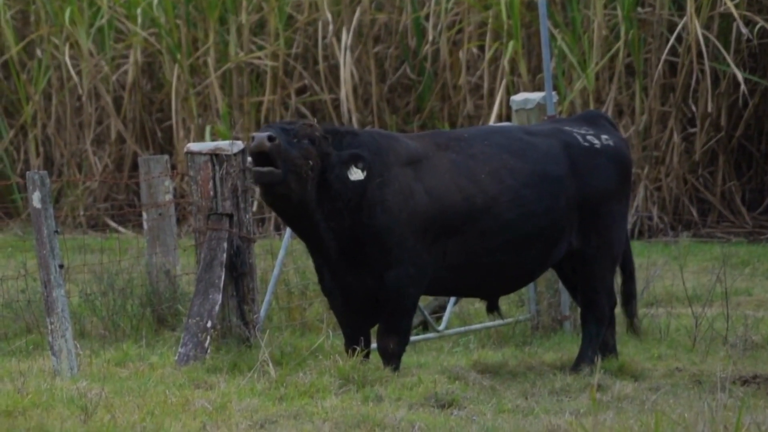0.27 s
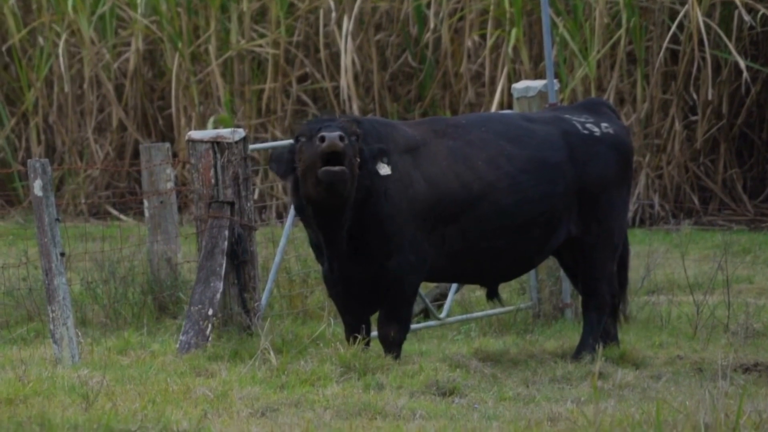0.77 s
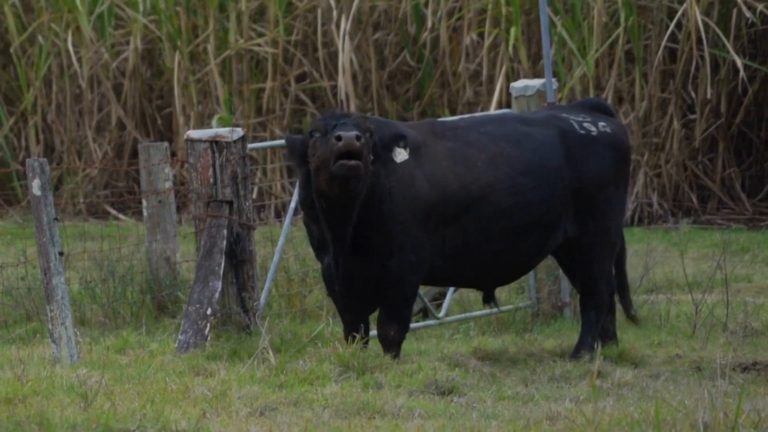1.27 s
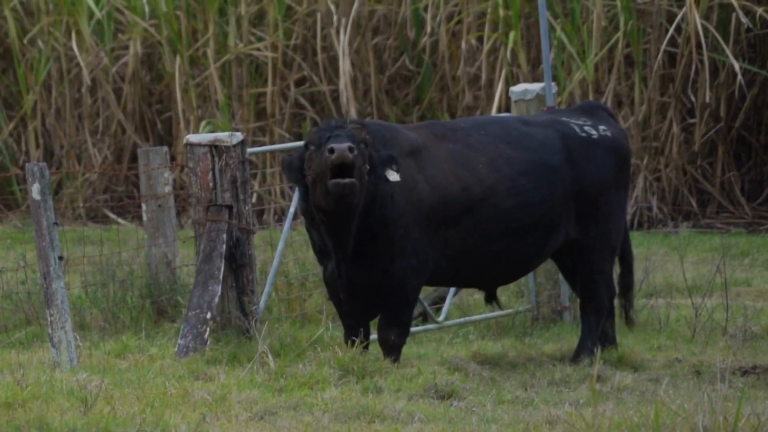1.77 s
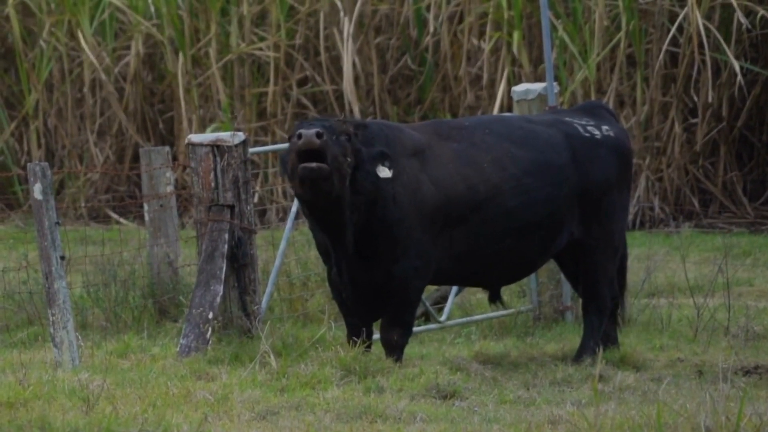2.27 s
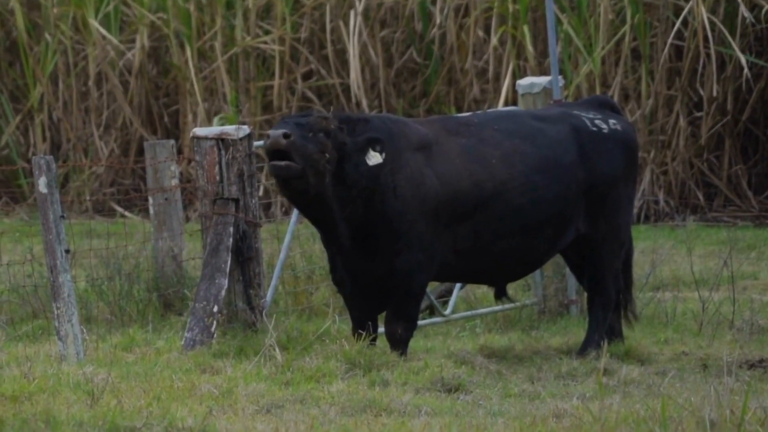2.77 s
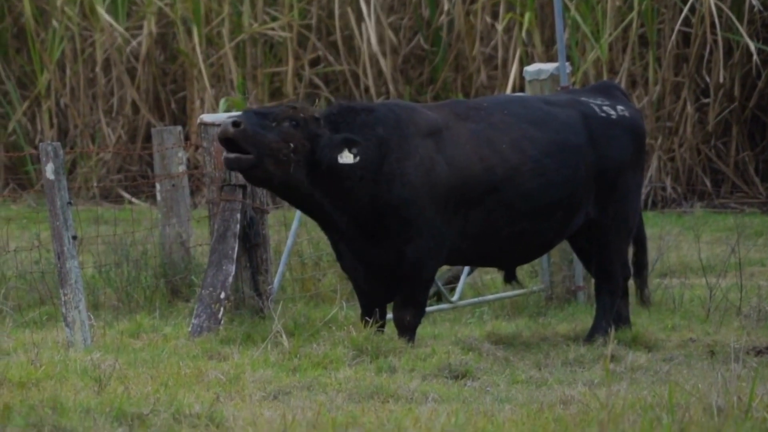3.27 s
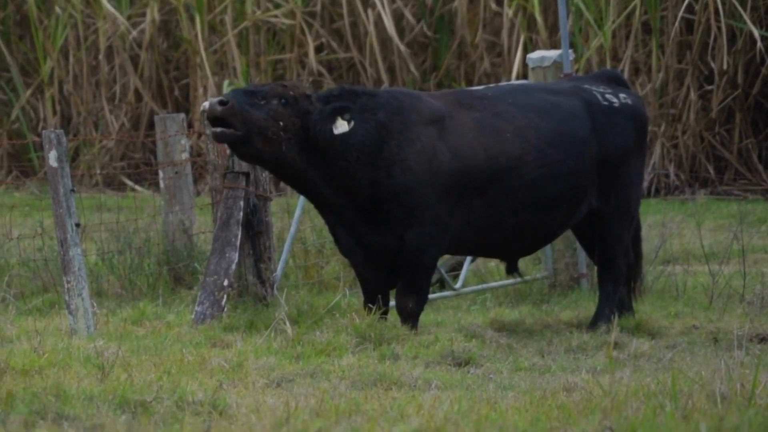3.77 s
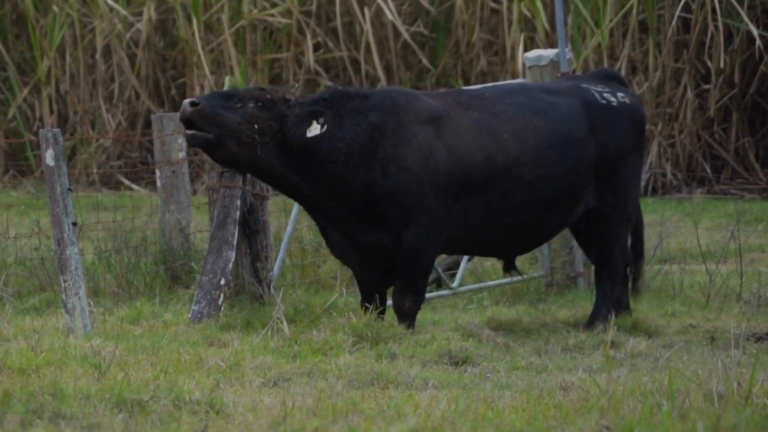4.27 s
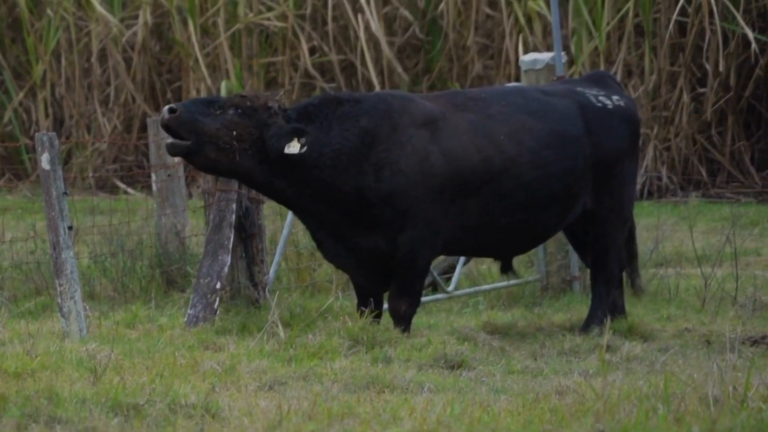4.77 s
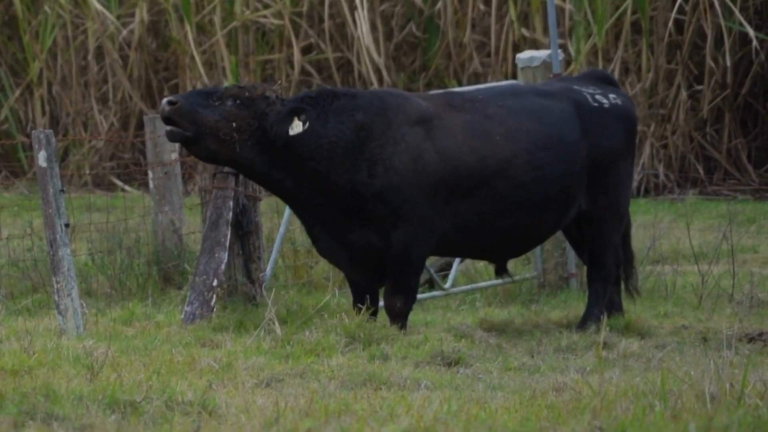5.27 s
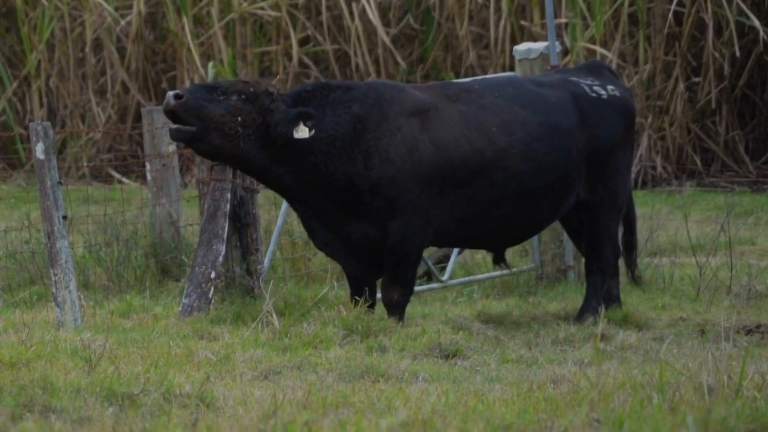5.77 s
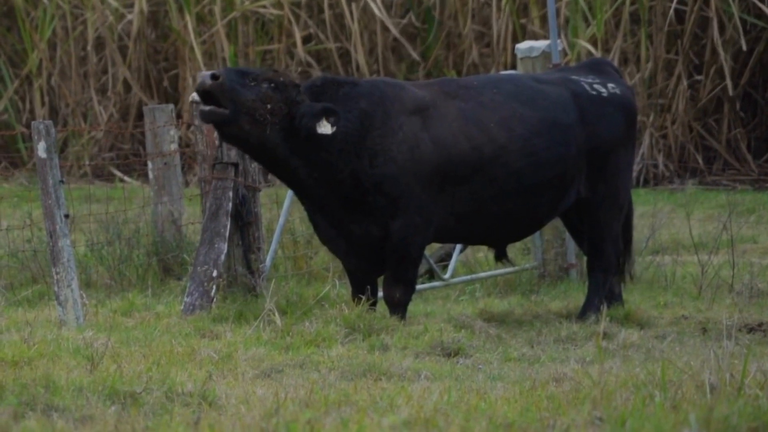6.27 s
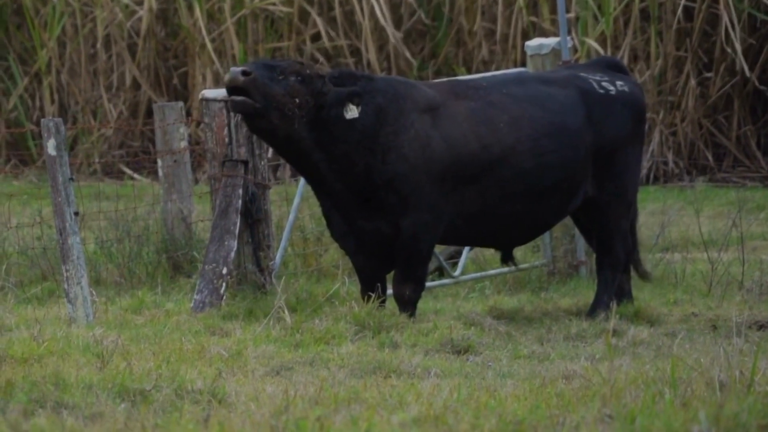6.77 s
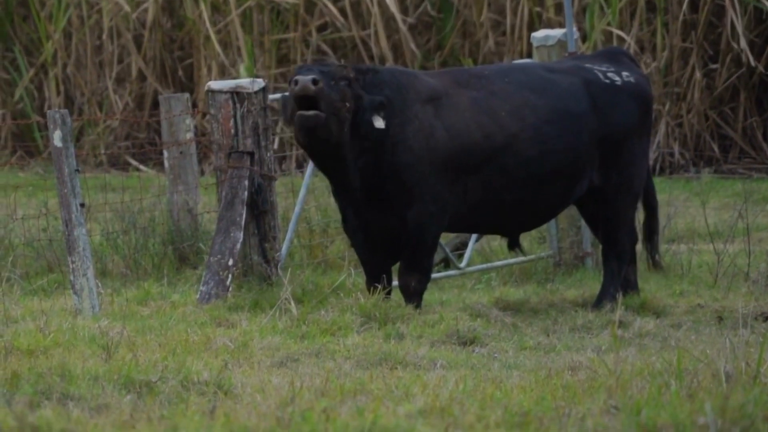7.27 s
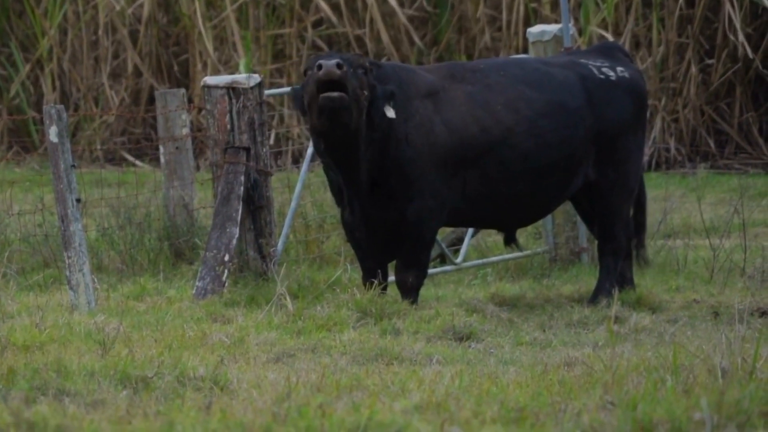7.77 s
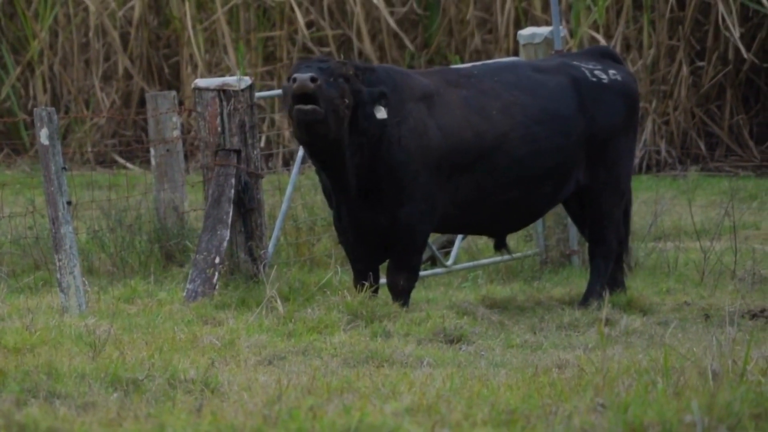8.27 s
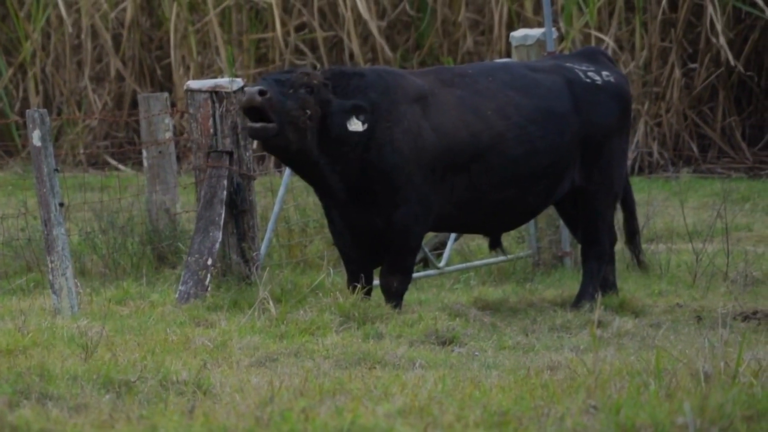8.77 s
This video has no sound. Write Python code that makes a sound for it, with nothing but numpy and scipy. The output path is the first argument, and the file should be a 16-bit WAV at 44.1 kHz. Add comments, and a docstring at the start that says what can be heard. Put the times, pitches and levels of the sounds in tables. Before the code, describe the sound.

A bull bellows seven times in an open pasture, with only short pauses between calls. Each begins as a deep hum, glides up to a high, hoarse held note and drops quickly away. A short echo comes back from the surroundings. Wind rumbles on the microphone, gusting most near the start, over a faint rustle of leaves.

```python
"""A bull bellows seven times in a pasture: deep hum, upward glide, high hoarse hold, quick drop.
Vocal-fold harmonics and rasping air ring through throat and mouth; the glide comes as the mouth opens.
Ground, posts and a wall of tall cane throw the calls back. Wind rumbles on the microphones
over the faint rustle of the field."""
import sys
import numpy as np
from scipy import signal
from scipy.fft import rfft, irfft, next_fast_len
from scipy.io import wavfile
from scipy.ndimage import uniform_filter1d

SR = 44100
rng = np.random.default_rng(int(sys.argv[2]) if len(sys.argv) > 2 else 0)


def log_audio(samples):
    """Write samples as a 16-bit WAV file to the path given in sys.argv[1]."""
    # one column per channel
    frames = np.atleast_2d(samples).T
    # limit to full scale, then quantise
    limited = np.clip(frames, -1, 1)
    pcm = np.round(limited * 32767).astype(np.int16)
    wavfile.write(sys.argv[1], SR, pcm)


N = 396900  # 9 s


def amp(db):
    return 10 ** (np.asarray(db) / 20)


def unit_rms(x):
    return x / np.sqrt(np.mean(x ** 2) + 1e-20)


def at_hz(points, hz):
    """Interpolates (frequency, value) rows over log frequency."""
    f, value = np.transpose(points)
    return np.interp(np.log(hz + 1), np.log(f + 1), value)


def filtered(x, gain):
    """Applies a real or complex gain(hz)."""
    size = next_fast_len(x.shape[-1] + 4096)
    return irfft(rfft(x, size) * gain(np.fft.rfftfreq(size, 1 / SR)), size)[..., :x.shape[-1]]


def wander(count, cutoff_hz):
    """Low-passed noise, rms 1."""
    return unit_rms(filtered(rng.standard_normal(count), lambda f: 1 / (1 + (f / cutoff_hz) ** 4)))


def wind_db(smooth_s):
    """Wind level: sudden gusts over a slow breeze."""
    # breeze (time [s], level [dB])
    breeze = [(0, -52.5), (.7, -48), (1.1, -33.5), (1.43, -32), (1.73, -53.5), (2.1, -43.5), (2.83, -49.5),
              (3.03, -51), (6.7, -48), (7.07, -54), (7.87, -50), (9, -52)]
    # gusts (peak time [s], peak level [dB], rise [dB/s])
    gusts = [(.05, -39, 502), (0.401, -34, 292), (.63, -28.5, 199), (1.05, -24, 63), (2.15, -40, 153),
             (2.88, -34, 265), (3.53, -40.5, 57), (4.05, -45, 198), (4.36, -30, 547), (5.16, -39, 82),
             (5.95, -42.5, 146), (6.52, -37, 91), (7.95, -42, 145), (8.95, -41, 145)]
    fall_db_per_s = 212.5
    t = np.arange(N) / SR
    level_db = np.interp(t, *np.transpose(breeze))
    for peak_s, peak_db, rise_db_per_s in gusts:
        below_db = np.where(t < peak_s, rise_db_per_s * (peak_s - t), fall_db_per_s * (t - peak_s))
        level_db = np.maximum(level_db, peak_db - below_db)
    return uniform_filter1d(level_db, round(smooth_s * SR))


def rustle():
    """Leaves and distant air: patchy noise that swells with the wind."""
    # rustle spectrum (frequency [Hz], relative density [dB])
    spectrum = [(120, -26.5), (250, -8), (450, -11.5), (900, 3.5), (1300, -1), (2000, -12.5), (3500, -18.5),
                (6000, -15.5), (8500, -23), (15500, -33.5)]
    # left-right likeness (frequency [Hz], correlation [-])
    likeness = [(300, 0.32), (1500, 0.74), (4500, 0.35), (7000, 0.49), (12000, 1)]
    frames, hz = N // 256 + 5, np.fft.rfftfreq(1024, 1 / SR)
    left_re, left_im, own_re, own_im, patches = rng.standard_normal((frames, 513, 5)).T
    patch_db = 2.5 * unit_rms(uniform_filter1d(uniform_filter1d(patches, 12, 0), 14, 1))
    corr = np.clip(at_hz(likeness, hz), -1, 1)[:, None]
    left = left_re + 1j * left_im
    right = corr * left + np.sqrt(1 - corr ** 2) * (own_re + 1j * own_im)
    bins = np.array([left, right]) * amp(at_hz(spectrum, hz)[:, None] + patch_db)
    noise = unit_rms(signal.istft(bins, nperseg=1024, noverlap=768)[1][:, :N])
    return noise * amp(-44 + 0.15 * (wind_db(smooth_s=0.47) + 51.5))


def wind_rumble():
    """Lumpy rumble, partly different at the two microphones; stronger wind reaches higher."""
    # rumble spectrum (frequency [Hz], relative density [dB])
    spectrum = [(10, -39.5), (20, -14.5), (45, -6), (80, -2.5), (130, -11.5), (200, -20.5), (300, -37.5),
                (500, -78.5)]
    common, side = rng.standard_normal((2, N)) * amp(4.3 * wander(N, 18))
    pair = np.array([common + 0.35 * side, common - 0.24 * side])
    rumble = unit_rms(filtered(pair, lambda f: amp(at_hz(spectrum, f))))
    upper = filtered(rumble, lambda f: 1 / (1 + (135 / (f + 1)) ** 8))
    upper *= amp(0.22 * (wind_db(smooth_s=0.99) + 34.5))
    return (rumble + upper) * amp(wind_db(smooth_s=.005))


def field_echoes(x):
    """Single echoes plus a decaying tail of sparse scatter."""
    # echoes off ground, posts and cane (delay [s], gain before colouring [dB])
    echoes = [(.018, -27.5), (.055, -22), (.125, -12), (.2, -17.5), (.31, -22.5)]
    # tail decay (frequency [Hz], T60 [s])
    t60 = [(150, 0.63), (400, 1.37), (1000, 1), (2500, 0.33), (8000, 0.67)]
    # colour of all reflections (frequency [Hz], gain [dB])
    colour = [(100, -4.5), (200, -12.5), (320, -1.5), (390, 16), (460, 5), (600, -5), (1000, -5.5),
              (2000, -8), (6000, 0.5)]
    taps = np.zeros((2, SR))
    tap_at = np.arange(900, SR - 20, 20) + rng.integers(0, 20, (2, (SR - 901) // 20))
    np.put_along_axis(taps, tap_at, rng.choice([-1., 1.], tap_at.shape), 1)
    taps = np.array([[1, 0.95], [1, 0.075]]) @ taps  # channels partly alike
    hz, t, bins = signal.stft(taps, SR, nperseg=512)
    response = signal.istft(bins * amp(-60 * t / at_hz(t60, hz)[:, None]), SR, nperseg=512)[1]
    response *= amp(-10) / np.linalg.norm(response[0])
    for i, (delay_s, db) in enumerate(echoes):
        lag_samples = 6 * np.array([i % 2, 1 - i % 2])  # sides alternate
        response[[0, 1], round(delay_s * SR) + lag_samples] += amp(db)
    coloured = filtered(x, lambda f: amp(at_hz(colour, f)))
    return signal.fftconvolve(coloured[None], response, axes=1)[:, :N]


def microphone_ports(x):
    """Mono to stereo: the housing shifts phase and balance with frequency."""
    # phase difference (frequency [Hz], left lead [rad])
    lead = [(100, -0.34), (690, 0.39), (1030, -0.081), (1380, 1.59), (1750, 0.64), (2070, -1.1),
            (2400, 0.9), (3100, 0.55), (4300, -1.74), (5600, 1.7), (7600, 0.36), (12000, .3)]
    # balance (frequency [Hz], left minus right [dB])
    balance = [(100, -0.5), (200, -1.5), (400, -1.5), (700, 0), (1300, -2), (2400, 3), (4400, -3.5),
               (8000, -.5)]
    left_gain = lambda f: amp(at_hz(balance, f) / 2) * np.exp(.5j * at_hz(lead, f))
    return np.array([filtered(x, left_gain), filtered(x, lambda f: 1 / left_gain(f))])


def tract_gain(hz, lips):
    """Throat and mouth, a long tube: resonances summed in power."""
    # resonances (centre [Hz], width [Hz], gain [dB])
    formants = [(198, 38, -19.5), (445, 24, -18), (715, 55, -4.5), (909, 159, 0), (1156, 118, -4),
                (1401, 63, 1), (1668, 267, -5), (1853, 165, -4), (2048, 39, -6), (2606, 450, -17.5),
                (3044, 210, -12), (4130, 370, -23), (4513, 380, -21), (5800, 1900, -32.5),
                (7590, 3900, -40), (12300, 11000, -50.5)]
    lip_ratio, lip_db = lips
    power = 0
    for centre_hz, width_hz, db in formants:
        if 2200 < centre_hz < 5000:
            centre_hz, db = centre_hz * lip_ratio, db + lip_db
        power += (amp(db) / (1 + (2 * (hz - centre_hz) / width_hz) ** 2)) ** 2
    return np.sqrt(power)


def fold_overtones(hz, cycles, tilt_db_per_oct, rough, lips):
    """Harmonics 2-12 of the fold pulses through the tract; sharper pulses tilt them upward."""
    hop = 32
    order, pitch_hz = np.arange(2, 13)[:, None], hz[::hop]
    chest = np.clip((430 - pitch_hz) / 60, 0, 1)  # softer pulses below the voice break
    source_db = tilt_db_per_oct[::hop] * np.log2(order / 2) - (1.82 + 1.1 * chest) * order
    weight = tract_gain(order * pitch_hz, lips) * amp(source_db)
    shut = np.clip((230 - pitch_hz) / 40, 0, 1)
    weight *= 1 - 0.87 * shut * np.exp(-((order * pitch_hz - 860) / 73) ** 2)  # shut-mouth notch
    weight = np.repeat(weight / np.linalg.norm(weight, axis=0), hop, 1)[:, :len(hz)]
    shimmer = 1 + (0.11 + 0.17 * rough) * np.array([wander(len(hz), 15) for _ in order])
    partials = np.cos(2 * np.pi * order * cycles + 0.798 * order ** 2)
    return np.sqrt(2) * (weight * shimmer * partials).sum(0)


def air_rasp(cycles, lips):
    """Rushing air, puffed once a fold cycle, through the tract."""
    # air colour against the pulses (frequency [Hz], gain [dB])
    colour = [(200, 2.5), (700, 5), (1000, 2), (1700, 5), (2800, -1), (4500, 0.5), (8000, -1.5)]
    count = len(cycles)
    puffs = (1 + 0.18 * np.cos(2 * np.pi * cycles)) * amp(1.9 * wander(count, 18))
    air = puffs * rng.standard_normal(count)
    muffle_db = lambda f: 0.54 * lips[1] * np.clip(np.log2(f / 1000 + 1e-9), 0, 1)
    gain = lambda f: tract_gain(f, lips) ** 0.84 * amp(at_hz(colour, f) + muffle_db(f))
    return unit_rms(filtered(air, gain))


def mouth_beam(mouth, t, hz):
    """Treble beams from the mouth, so it swells as the head swings round."""
    # head swing (time [s], treble gain [dB])
    facing = [(0, 1.5), (1, -0.5), (1.75, 2.5), (2.05, 10), (2.4, -1), (3.25, 5), (3.55, -1.5), (5, -1.5),
              (6, 4.5), (6.4, 0.5), (7.4, -3), (7.65, -1), (7.9, 1.5), (8.55, 3.5), (9, -4.5)]
    treble = filtered(mouth, lambda f: 1 / (1 + (3200 / (f + 1)) ** 4))
    hum_lift_db = 9 * np.clip((300 - hz) / 100, 0, 1)
    treble_db = np.interp(t, *np.transpose(facing)) + hum_lift_db
    return mouth + (amp(treble_db) - 1) * treble


def chest_ring(since_s, hz, start_cycles, hum_db, jaw_s):
    """The chest rings on at the hum's last pitch once the jaw parts."""
    t60_s = .19
    envelope = amp(hum_db - 2 - 60 * since_s / t60_s) * np.minimum(since_s / jaw_s, 1) ** .5
    return np.sqrt(2) * envelope * np.sin(2 * np.pi * (start_cycles + hz * since_s))


def contour(call, hold, jaw_s):
    """Joins hum, glide, hold and drop. Rows: the hold's columns plus tilt [dB/oct]."""
    # shut-mouth leak at start, half swell, full swell, end (overtones [dB], rasp [dB], tilt [dB/oct])
    hum_leak = [(-49, -6.5, -5.5), (-47.5, -4.5, 3), (-40, -10.5, 2.5), (-39, -5, 2.5)]
    # glide (way to the break [0-1], pitch [Hz], fundamental [dB], overtones [dB], rasp [dB],
    # tilt [dB/oct])
    glide = [(0, 239.8, -29, -29, -9, 1.5), (0.381, 292.5, -31, -28, -2, -4.5),
             (.72, 356.1, -37.5, -17, -11, -4.5), (.93, 395, -56, -23.5, -8, -3)]
    # drop (share of length [-], pitch [Hz], fundamental re thump [dB], overtones [dB], rasp [dB],
    # tilt [dB/oct])
    drop = [(.2, 341.7, -11.5, -21, 2.5, -10.5), (.45, 248, -6, -25, -2.5, -10.5),
            (.72, 190, 1, -40, -9, -15), (1.001, 150, -15.5, -49, -9.5, -2.5)]
    start_s, swell_s, glide_s, from_hz, to_hz, hum_db, drop_s, thump_db, *hold_tilts = call
    break_s, release_s = hold[0][0], hold[-1][0]
    settled_hz = from_hz + .62 * (to_hz - from_hz)
    hum = [(start_s, from_hz, hum_db - 40.5),
           (start_s + swell_s / 2, (from_hz + settled_hz) / 2, hum_db - 11),
           (start_s + swell_s, settled_hz, hum_db),
           (max(glide_s - jaw_s, start_s + swell_s), to_hz, hum_db)]
    rows = [point + leak for point, leak in zip(hum, hum_leak)]
    for share, *rest, tilt in glide:
        rows.append((glide_s + share * (break_s - glide_s), *rest, tilt + .4 * hold_tilts[0]))
    for time_s, hz, *levels in hold:
        strain = 0.2552 * max(hz - 445, 0)  # strained folds close more sharply
        rows.append((time_s, hz, *levels, np.interp(time_s, (break_s, release_s), hold_tilts) + strain))
    for share, hz, db, *rest in drop:
        rows.append((release_s + share * drop_s, hz, thump_db + db, *rest))
    return rows


def bellow(call, hold, lips):
    """One call: fundamental, overtones, rasp and chest ring. Returns (start sample, signal)."""
    jaw_s, fade_s, flutter_hz = 0.03013, .02, 58.03
    times_s, *columns = np.transpose(contour(call, hold, jaw_s))
    t = np.arange(times_s[0], times_s[-1], 1 / SR)
    hz, fundamental_db, mouth_db, rasp_db, tilt_db_per_oct = (np.interp(t, times_s, c) for c in columns)
    rough = amp(rasp_db) / np.sqrt(1 + amp(2 * rasp_db))
    cycles = np.cumsum(hz * (1 + .0015 * wander(len(t), 15))) / SR
    slip = np.cumsum(hz * .009 * rough ** 2 * wander(len(t), 70)) / SR  # hoarse folds lose their beat
    overtones = fold_overtones(hz, cycles + slip, tilt_db_per_oct, rough, lips)
    rasp = air_rasp(cycles + slip, lips)
    flaps = np.cumsum(flutter_hz * (1 + 0.2 * wander(len(t), 12))) / SR
    flutter = 1 + rough ** 2 * np.cos(2 * np.pi * flaps)  # slack tissue beating
    mouth = amp(mouth_db) * (np.sqrt(1 - rough ** 2) * overtones * flutter + rough * rasp)
    low_tone = np.sin(2 * np.pi * cycles) + amp(-36.5) * np.sin(4 * np.pi * cycles)
    voice = mouth_beam(mouth, t, hz) + np.sqrt(2) * amp(fundamental_db) * low_tone
    hum_end = np.searchsorted(t, times_s[3])
    since_s = np.maximum(t - t[hum_end], 0)
    voice += chest_ring(since_s, hz[hum_end], cycles[hum_end], fundamental_db[hum_end], jaw_s)
    fade = np.clip(np.minimum(t - times_s[0], times_s[-1] - t) / fade_s, 0, 1)
    return round(times_s[0] * SR), voice * fade


def bull():
    """Seven bellows, mono."""
    # calls (start [s], swell [s], glide start [s], hum from [Hz], hum to [Hz], hum [dB], drop length [s],
    # thump ending the drop [dB], tilt at hold start [dB/oct], tilt at hold end [dB/oct])
    calls = [(-.1, 0.052, 0.0, 159.4, 178.8, -22.5, 0.098, -24.5, -3, -9.5),
             (1.42, 0.031, 1.48, 197.5, 208.6, -22, 0.1, -21.5, -4, -8.5),
             (2.79, 0.06, 2.91, 161.3, 181.3, -12, .115, -24, -6, -12),
             (4.05, .12, 4.415, 132.8, 180.9, -12, 0.1, -24, -9.5, -19.5),
             (5.43, 0.0803, 5.65, 145.9, 180.9, -12, .115, -22, -11.5, -7.5),
             (6.9, 0.089, 7.075, 142.7, 179.4, -13, .11, -21, -5.5, -2),
             (8.27, 0.072, 8.4, 149.8, 177.9, -13.5, 0.12, -24, 0, -4.5)]
    # high hold per call, voice break to drop
    # (time [s], pitch [Hz], fundamental [dB], overtones with rasp [dB], rasp re overtones [dB])
    holds = [
        [(.14, 437.4, -38, -25, -9.5), (.22, 445.6, -36, -18.5, -11.5), (.3, 450.2, -32.5, -13.5, -14.5),
         (.42, 452.8, -41, -12.5, -18.5), (.53, 458.7, -28.5, -12.5, -14), (.72, 458.5, -39.5, -16.5, -13.5),
         (.88, 457.8, -22.5, -16.5, -7.5), (.95, 454, -29.5, -17, -5), (.985, 455, -25, -18, -3)],
        [(1.615, 445, -39.5, -23, -12), (1.7, 453.4, -37.5, -18, -10), (1.79, 458.2, -32, -11.5, -13.5),
         (1.88, 465.3, -32.5, -16, -7.5), (1.96, 480.3, -26.5, -22, -2.5), (2.05, 485.5, -43, -23.5, 2),
         (2.22, 476.7, -32, -18, -5.5), (2.29, 467.6, -32.5, -17.5, -4.5), (2.35, 440, -30.5, -15.5, -4.5)],
        [(3.053, 434.6, -48, -24, -13.5), (3.15, 447.2, -37.5, -19.5, -12.5), (3.26, 448.4, -39.5, -11.5, -15),
         (3.37, 460.8, -31.5, -15.5, -10.5), (3.4, 460, -39.5, -21.5, -2), (3.48, 460, -26.5, -15.5, -4),
         (3.56, 457.9, -29, -15.5, -8), (3.64, 428.7, -34, -17.5, -3.5)],
        [(4.563, 451.6, -41.5, -26, -15.5), (4.65, 449, -42.5, -19.5, -10.5), (4.75, 437, -32.5, -14.5, -16),
         (4.775, 456.6, -32.5, -19.5, -2.5), (4.86, 453.7, -30, -19, -8.5), (4.92, 470, -33.5, -19.5, -6.5),
         (4.975, 455.3, -26, -17.5, -6.5), (4.99, 420, -31.5, -24, -3.5)],
        [(5.835, 428, -40, -27, -16.5), (5.95, 444.7, -40, -20.5, -13), (6.03, 441.6, -41, -16, -12.5),
         (6.1, 449.5, -37.5, -12, -17.5), (6.22, 454.6, -24.5, -15.5, -8.5), (6.3, 459, -45, -17.5, -2.5),
         (6.38, 447.4, -41, -18, 0), (6.45, 412, -33.5, -17.5, -1.5)],
        [(7.22, 441.7, -36.5, -23.5, -5), (7.32, 444.6, -34.5, -16.5, -10.5),
         (7.43, 444.6, -27.5, -11.5, -12.5), (7.45, 459, -31, -15, -9), (7.54, 463.2, -34, -18, -3),
         (7.62, 478.5, -29.5, -20, -7), (7.7, 471.6, -27.5, -17, -2.5), (7.76, 444.8, -33.5, -16.5, -3.5),
         (7.82, 412, -34, -14.5, -2)],
        [(8.57, 429, -47, -23.5, -12), (8.66, 435.5, -43.5, -23.5, -7), (8.78, 429.7, -38, -17, -12),
         (8.9, 438, -28, -15.5, -16), (9.02, 436.7, -26, -14.5, -11.5)],
    ]
    # stretched neck and pushed-out lips per call, on resonances at 2.2-5 kHz (ratio [-], gain [dB])
    lip_shapes = [(0.955, -2), (0.938, -2), (0.917, -7), (0.903, -6), (0.9, -9), (0.945, -3.1),
                  (0.94, -2.5)]
    track = np.zeros(N)
    for call, hold, lips in zip(calls, holds, lip_shapes):
        start, voice = bellow(call, hold, lips)
        track[max(start, 0):start + len(voice)] += voice[max(-start, 0):N - start]
    return track


def scene():
    """Bull, echoes, rustle and wind, stereo."""
    voice = bull()
    return microphone_ports(voice) + field_echoes(voice) + rustle() + wind_rumble()


def record(dry):
    """Recorder band limit."""
    cutoff_hz = 15580
    lowpass = signal.firwin(1023, cutoff_hz, window=("kaiser", 10), fs=SR)
    return signal.oaconvolve(dry, lowpass[None], "same")


dry = scene()
out = record(dry)
log_audio(out)
```